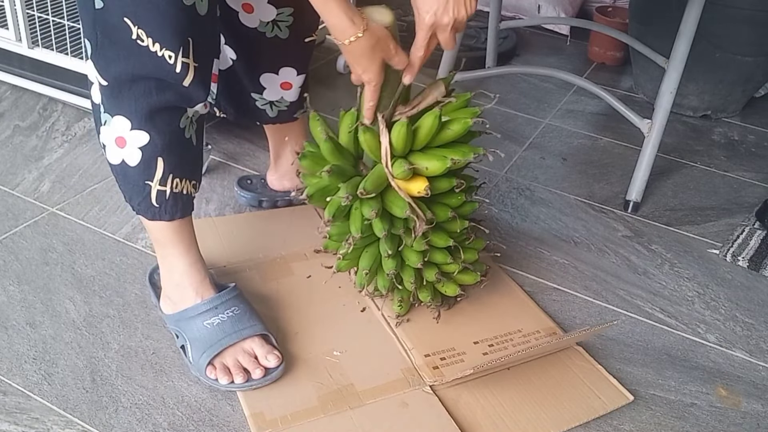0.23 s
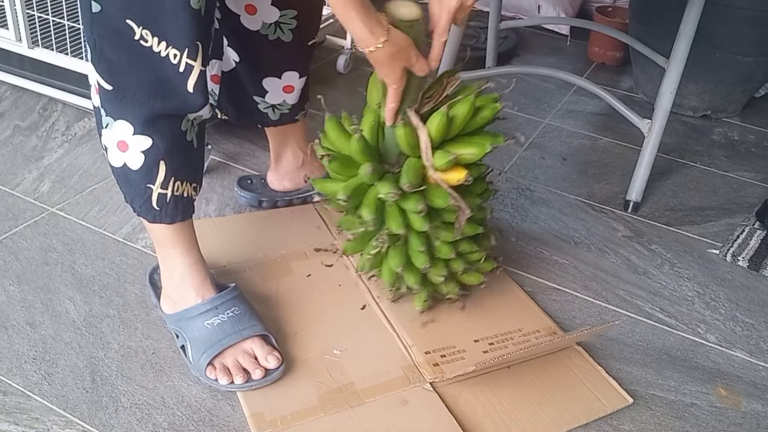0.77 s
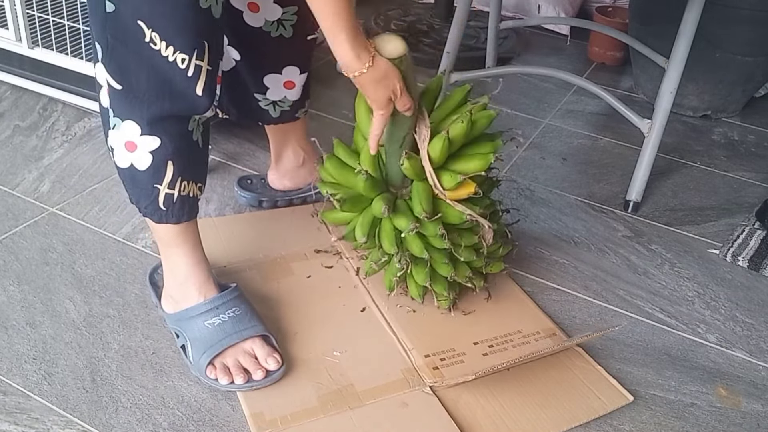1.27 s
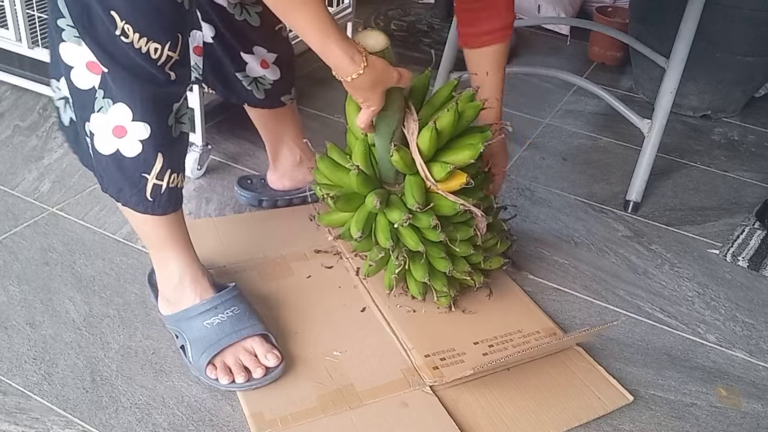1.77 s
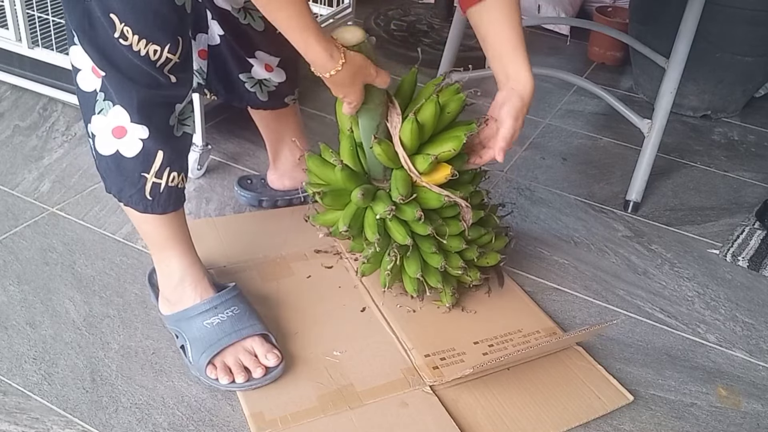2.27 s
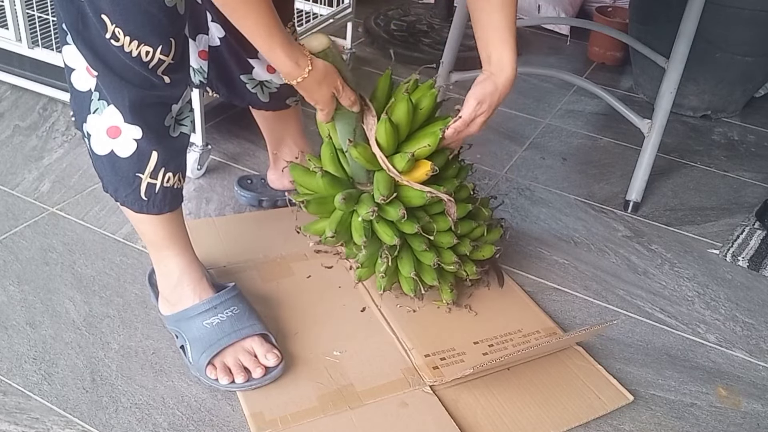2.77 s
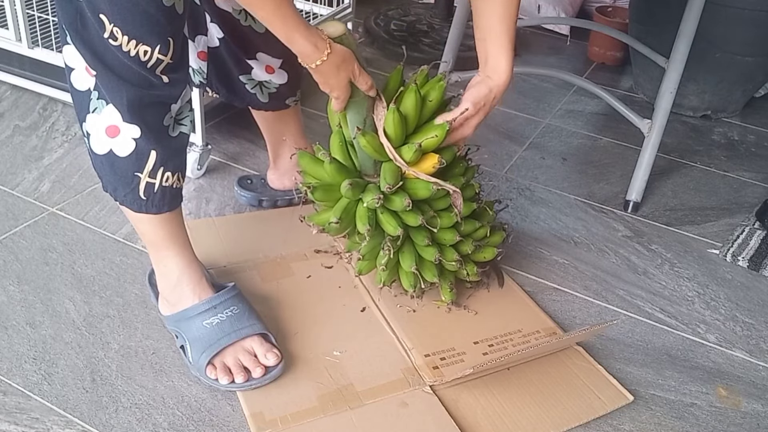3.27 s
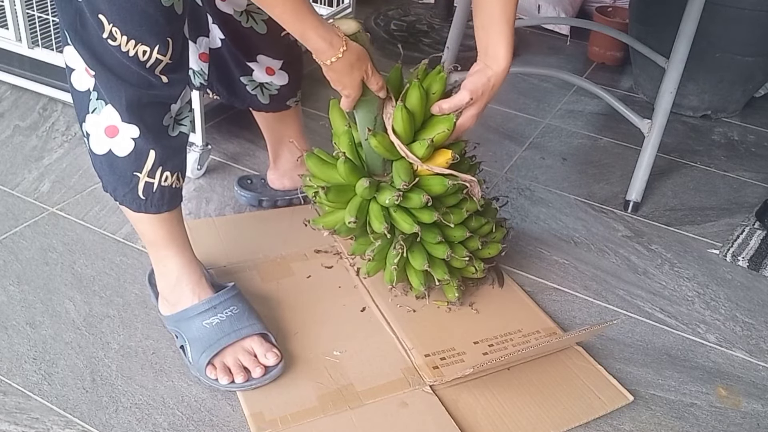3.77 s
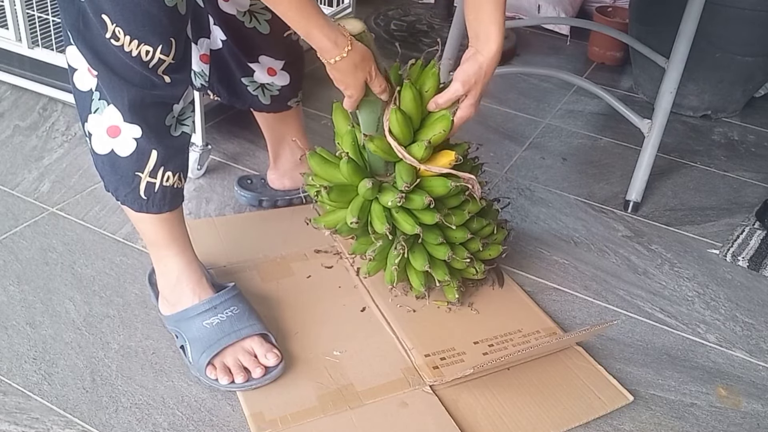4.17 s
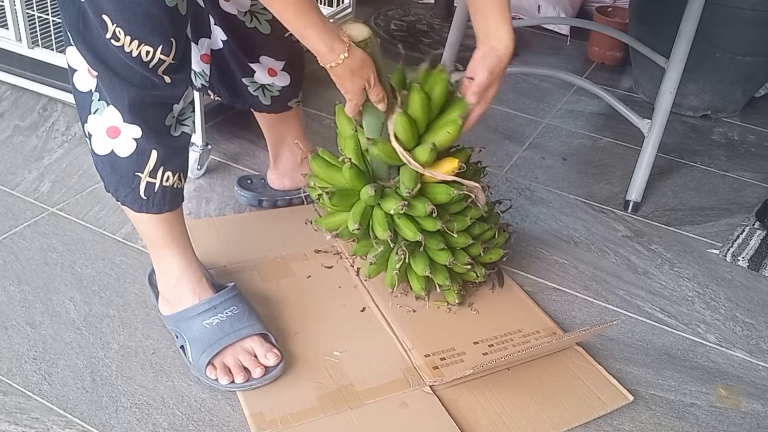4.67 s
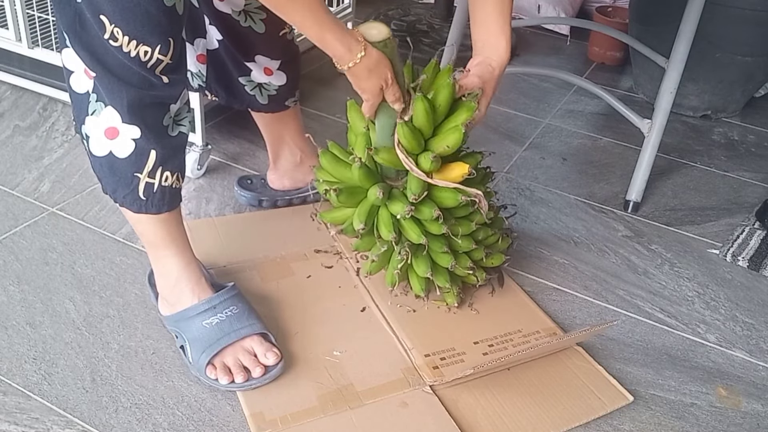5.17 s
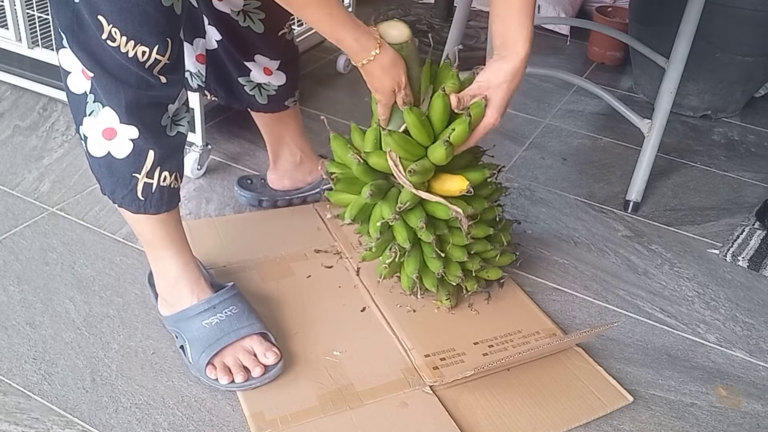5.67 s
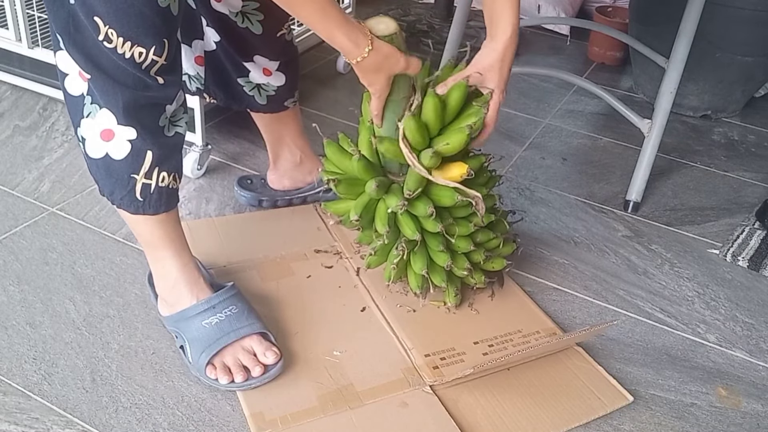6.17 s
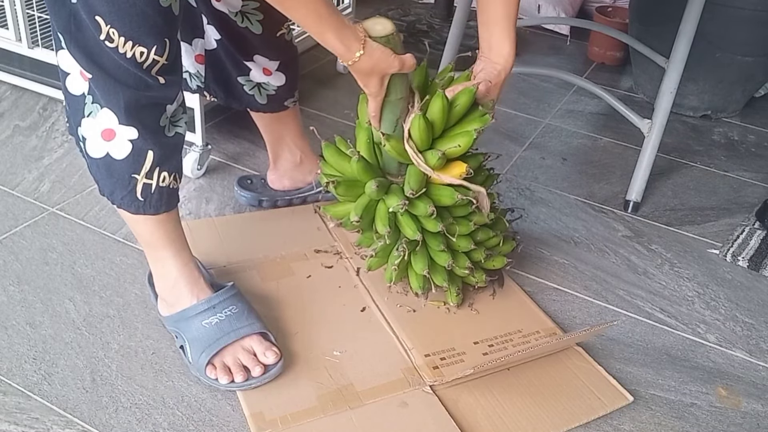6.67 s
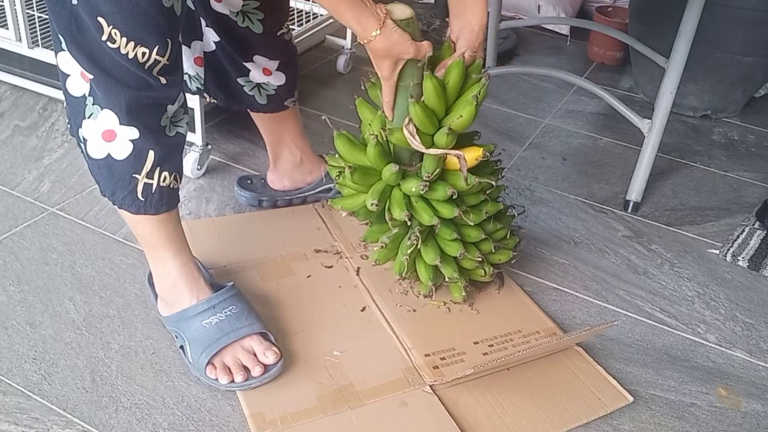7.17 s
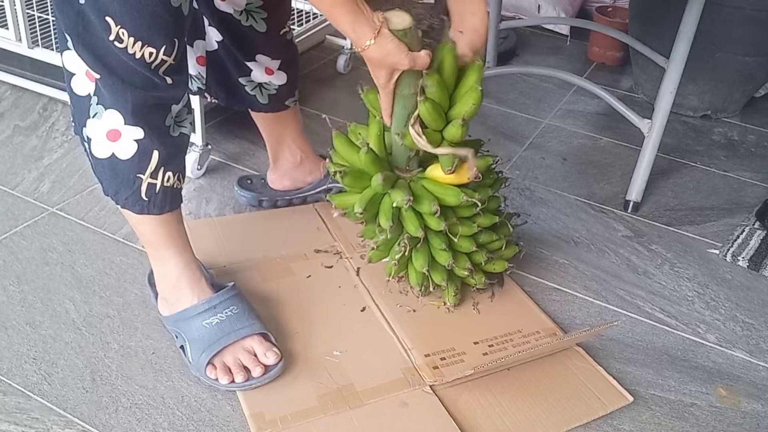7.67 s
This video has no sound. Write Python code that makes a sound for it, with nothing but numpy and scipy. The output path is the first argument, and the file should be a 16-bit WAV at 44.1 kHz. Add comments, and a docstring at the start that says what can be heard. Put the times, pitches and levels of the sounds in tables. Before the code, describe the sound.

Hands twist green bananas off a stalk with crisp snaps and rustling, and a dropped piece knocks and bounces on cardboard.

```python
"""Hands work at a bunch of green bananas: dry fibres snap and rustle, and the skins rub and creak.
A torn-off piece drops and bounces on a cardboard sheet, and something thin rings when brushed.
Snaps and knocks are tiny bursts of noise shaped by what rings; rubbing is noise broken into grains.
The tiled kitchen answers every crack with a short echo. Behind it all a far bird calls,
a motor hums, and insects or a lamp whine faintly."""
import sys
import numpy as np
from scipy import signal
from scipy.fft import rfft, irfft, next_fast_len
from scipy.io import wavfile
from scipy.ndimage import uniform_filter1d, map_coordinates

SR = 44100
rng = np.random.default_rng(int(sys.argv[2]) if len(sys.argv) > 2 else 0)


def wrap_up_sound(samples):
    """Save the sound to the file named by the first command line argument, as 16-bit audio."""
    columns = np.atleast_2d(samples).T
    # keep every value between -1 and 1, then stretch to whole-number steps
    tamed = np.clip(columns, -1, 1)
    steps = np.round(tamed * 32767).astype(np.int16)
    wavfile.write(sys.argv[1], SR, steps)


N = 348831

# Sharp cracks: fibres breaking, and near 1.76-1.85 s a brief metallic clatter: start_s, level_db, ring_hz,
# body_db, air_db
SHARP_CRACKS = [(0.4135, -31, 4170, -10.5, -41), (0.631, -43.5, 6150, -19, -9),
                (0.7831, -36.5, 5140, -46, -11), (0.919, -13.5, 6700, -5, -29),
                (0.922, -21.5, 2820, 20, -17), (1.117, -14.5, 6560, -16.5, -15),
                (1.1216, -14.5, 7060, -37, -32), (1.1724, -24, 4870, -32, -7), (1.2176, -27.5, 3030, 1, -2),
                (1.2313, -16, 3050, -8, -6), (0.939, -33, 3370, -24, 6), (1.243, -32, 3070, -11.5, -6),
                (1.267, -18, 3050, -10, -9), (1.7621, -20, 5500, -10.5, -16), (1.7897, -23, 5340, -5, -14),
                (1.8377, -19.5, 3500, -22, -15), (1.8511, -22, 3280, -10.5, -23.5),
                (2.438, -47, 2480, -22, 9), (2.5022, -47, 6750, -18.5, -5), (2.7109, -47.5, 6400, -2, -17),
                (2.7596, -55, 3000, 1, -16), (3.0807, -57, 5500, -23, -24.5), (3.629, -45.5, 6940, -16, -7),
                (3.6627, -39, 6430, -20, 9), (3.7003, -39.5, 6590, -4, -7),
                (3.7868, -41.5, 6040, -21.5, -34), (3.9449, -42.5, 6270, -28.5, -12.5),
                (3.9953, -37.5, 6610, -23.5, -6.5), (4.0926, -46.5, 5480, -22, -16),
                (4.2511, -4, 5670, -5.5, -18.5), (4.3147, -5, 6000, -8.5, -11.5),
                (4.4352, -18, 6000, -16, -4.5), (4.4411, -26, 6160, -11, -3), (4.4967, -27, 6830, -35, 8),
                (4.5045, -29, 6620, -23, 12), (4.5078, -16, 6660, -12.5, -6), (4.5129, -16, 6450, -40, -6.5),
                (4.7118, -35.5, 5400, -16, -13), (4.813, -43, 6680, -15, -33.5), (4.8764, -41, 6410, -32, 7),
                (4.9534, -44.5, 6420, -20, 5), (4.9202, -43.5, 6750, -22.5, -3.5),
                (5.1475, -24.5, 6550, -32.5, 1.5), (5.2033, -26, 6620, -41, 1), (5.2444, -30, 6600, -27, -2),
                (5.3028, -35, 5920, -32, -1), (5.3378, -37.5, 6190, -27, 3), (5.3951, -41.5, 6000, -30, 1),
                (5.5697, -43.5, 6900, -15, -1), (5.744, -35.5, 3380, -22, -11),
                (5.8726, -42, 3130, -20, -2.5), (6.1769, -41, 6170, -22, -21),
                (6.2968, -46.5, 5620, -22, -16), (6.4647, -48.5, 5890, -22, -7),
                (6.2442, -41.5, 6620, -11.5, -8), (6.6562, -34.5, 6050, -18.5, 1),
                (7.0946, -18.5, 6000, -1, 4), (7.1306, -33.5, 2830, 7, -12), (7.21, -34.5, 5220, 6.5, 2),
                (7.2974, -32, 6900, -7, -10), (7.3513, -30, 5920, -17.5, -14), (7.4054, -35.5, 6600, -24, 1),
                (7.436, -31, 6710, -18, -4.5), (7.5013, -34, 6400, -23.5, 1), (7.5316, -30.5, 5130, -28, -9),
                (7.537, -30, 6650, -27.5, -9.5), (7.7394, -33.5, 6510, -25, -4),
                (7.7555, -35.5, 6260, -13, -13)]
# How the stalk rings, in the groups "body", "crack" and "air": pitch_hz, width_hz, level_db
STALK_RINGS = {"body": [(721.4, 110, -3.2), (1550, 1300, 9.5)], "crack": [(3715, 990, -5.5),
               (5030, 5800, -4.5)], "air": [(12500, 13000, 8.5)]}
# Hand strokes; the rustle swells by 20 dB over rise_s and fades by 20 dB over fall_s:
# peak_s, rise_s, fall_s, rustle_db, creak_over_rustle_db, air_over_rustle_db, creak_hz
HAND_STROKES = [(0.002, .05, 0.057, -64, -6, -2, 2260), (0.094, 0.052, 0.07, -45.5, -13.5, 1.5, 1070),
                (0.214, 0.32, 0.054, -59, -10, 4, 1040), (0.299, 0.05, 0.043, -46, -13.5, 3.5, 1510),
                (0.425, 0.097, 0.32, -51, -5.5, 2.5, 1440), (0.841, 0.15, 0.24, -48, -5, 2.5, 930),
                (0.916, 0.07, 0.081, -38.5, 11.5, 7.5, 1400), (1.074, 0.023, .1, -56, 7, -15, 1400),
                (1.123, 0.049, .12, -39.5, 1, 8.5, 1730), (1.17, 0.1, 0.053, -34, -6.5, 2.5, 1960),
                (1.279, 0.25, 0.064, -56, 3.5, -19, 1660), (1.43, 0.17, 0.069, -71, -22, 3, 1200),
                (1.766, 0.0048, 0.18, -34.5, -19, -10, 1060), (1.858, 0.064, 0.17, -45, -11, -23, 1060),
                (1.96, .01, 0.4, -51, -21, -2.5, 1200), (2.1, 0.033, 0.21, -63.5, -21.5, 0, 1500),
                (2.22, .03, .25, -56, -20.5, -1, 1700), (2.4, .02, .22, -76, 6, 2, 1470),
                (2.64, .12, .35, -74, 1, 3, 2590), (3.64, 0.067, 0.23, -69, 10.5, 4, 1137),
                (3.7, 0.11, 0.27, -59.5, 0.5, 2.5, 1050), (3.955, 0.021, 0.031, -58, -7, 5, 1567),
                (4.1, .17, .2, -65, -9, -2, 1870), (4.197, 0.086, 0.053, -63, -11, -3, 1570),
                (4.263, 0.013, 0.17, -36.5, -2, 1, 2000), (4.445, 0.011, 0.17, -48.5, -16, 2, 2000),
                (4.565, .02, 0.33, -57, -11, 0.5, 1900), (4.723, 0.19, 0.38, -61.5, -6.5, 2.5, 1380),
                (5.007, 0.19, 0.31, -67, 0.5, 5.5, 2060), (5.168, .02, 0.42, -64, -6, 11.5, 2062),
                (5.298, 0.049, 0.22, -56.5, -14.5, 9.5, 1680), (5.583, 0.11, .45, -59.5, -4.5, 4, 2200),
                (5.755, 0.14, .45, -54, -8, 1.5, 2240), (5.893, 0.21, 0.061, -57.5, -5.5, 2, 2620),
                (5.978, 0.045, 1, -63, -7, 3.5, 2340), (6.256, 0.049, .11, -62, -20, -1, 1576),
                (6.199, .05, 0.13, -70, 1, 0, 1280), (6.389, 0.056, 0.2, -60.5, -8, 0.5, 1556),
                (6.652, 0.043, 0.12, -60.5, -15.5, 7, 2390), (6.836, 0.035, 0.14, -64, -21.5, -8, 1660),
                (6.966, 0.14, 0.14, -70, -24, -8, 2350), (7.04, 0.039, .2, -61, 8, 4, 1750),
                (7.1, 0.025, 0.15, -48.5, -2.5, -5.5, 1460), (7.21, 0.037, 0.13, -65, 7, -3.5, 1600),
                (7.313, 0.56, 0.079, -52.5, -7.5, 1.5, 1960), (7.361, 0.081, 0.34, -50.5, -12.5, 4.5, 2246),
                (7.543, 0.023, 0.15, -48, -14.5, 3.5, 2177), (7.619, 0.13, .12, -55.5, -7.5, 6, 2280),
                (7.759, 0.056, 0.1, -45, -9, 1.5, 1960), (7.898, 0.074, .1, -58, -26, -6.5, 2220)]
# The tone of rubbing, from bass to treble: pitch_hz, level_db
RUB_COLOUR = [(76, -44.5), (130, -13.5), (263, -16.5), (418, -6), (613, -4), (780, -4.5), (1140, -4.5),
              (1430, 0.5), (1860, -6.5), (4410, -5.5), (6730, 1), (7910, -6.5), (13100, -0.5),
              (16000, -6.5)]
# The dropped piece landing and bouncing: start_s, level_db, ring_hz, thud_db, click_db, echo_db
BOUNCES = [(1.9191, -25.5, 1600, -11, -15, -1), (1.9272, -24.5, 910, 0.5, -27.5, 0.5),
           (1.9468, 0, 1265, -4.5, -20.5, -3.5), (2.0485, -25.5, 1450, -16.5, -36, -9.5),
           (2.0738, -23, 1510, 3, -26, 1), (2.0872, -18.5, 850, -4, -40.5, -7.5),
           (2.0962, -17.5, 1930, -0.5, -25, -8), (2.1985, -32.5, 1440, -8, -35.5, -8),
           (2.2136, -6, 1720, -19, -29, -8.5), (2.2776, -8, 2000, -14.5, -30.5, -8.5),
           (2.3118, -16.5, 1700, -13, -37, -13.5)]
# How each landing rings: pitch_hz, width_hz, level_db
BOUNCE_RINGS = [(264, 62, -4), (424, 40, 6), (663, 90, -1.5), (790, 290, -10), (1136, 23, 3.5),
                (1217, 78, 1), (1640, 120, 5), (2800, 390, 8.5)]
# Brushes against the thin object: start_s, level_db
BRUSH_TOUCHES = [(0.087, -62), (1.76, -48), (1.79, -46), (1.845, -47)]
# The thin object's tones: pitch_hz, level_db, fade_s (time to fall by 60 dB)
THIN_TONES = [(1084, -0.5, .45), (1316, -5, .17), (1680, -3, 0.22), (3104, -7, .15)]
# The bird's notes: start_s, length_s, first_hz, last_hz, level_db
BIRD_NOTES = [(2.436, 0.1, 2274, 2217, -62), (2.613, 0.081, 3436, 3060, -61),
              (2.79, 0.093, 2316, 2193, -67.5), (4.97, 0.057, 2194, 2240, -71),
              (5.591, 0.07, 2230, 2300, -62), (5.937, 0.087, 2294, 2325, -61.5)]
# The motor's hum and the faint whines: pitch_hz, level_db
HUM_AND_WHINES = [(102.3, -73.5), (6401, -83.5), (8177, -91), (12801, -90.5), (13598, -91)]
# The tone of the room's hiss and rumble: pitch_hz, level_db
HISS_COLOUR = [(25, -41.5), (59, -16.5), (91, -4), (130, -20.5), (260, -23.5), (600, -30.5), (1000, -34.5),
               (4200, -43.5), (6500, -33.5), (7300, -34.5), (8400, -25.5), (9300, -49), (12600, -37.5),
               (15600, -42)]
# How alike left and right are, for hiss and for rubbing: pitch_hz, likeness (1 = the same)
HISS_LIKENESS = [(60, 0.7), (240, 0.64), (950, 0.083), (3770, 0.17), (15000, 0.12)]
RUB_LIKENESS = [(500, 0.31), (4000, 0.59), (12000, 0.19)]
# How long the kitchen echoes: pitch_hz, fade_s (time to fall by 60 dB)
ECHO_FADES = [(200, 0.44), (1400, 0.23), (4000, 0.33), (10000, .22)]
# Pitches that the microphone's opening lifts or lowers: pitch_hz, width_hz, gain_db
MIC_RINGS = [(6340, 1800, 3.5), (7820, 1266, -7), (12500, 9800, -0.5)]
# The microphone's balance: pitch_hz, left_minus_right_db
MIC_BALANCE = [(500, -3), (4000, 0), (7000, 0.5), (12000, -10)]

CREAK_SWING, AIR_SWING = 1.2, 1.3  # creak and air swell and fade more steeply than the rustle
HISS_DB, TOP_HZ = -63, 15750


def sharp_cracks():
    """A sharp crack rings, with the stalk's body below it and airy treble above."""
    def stalk(f, group):
        return sum(amp(db) * resonance(f, hz, width) ** 2 for hz, width, db in STALK_RINGS[group])

    def colour(f, ring_hz, body_db, air_db):
        crack = resonance(f, ring_hz, 900) + stalk(f, "crack")
        return crack - amp(body_db) * stalk(f, "body") - amp(air_db) * stalk(f, "air")

    echo_db = -4
    return hits([(*row, echo_db) for row in SHARP_CRACKS], colour, burst_s=.0013, pan_db=1, scatter_db=3)


def rubbing_hands():
    """Skins and fibres rub; bent fibres creak at a pitch set by the grip, and the finest ones tick."""
    def band(noise, low_hz, high_hz):
        edges = lambda f: np.sqrt((1 + (low_hz / (f + 1)) ** 8) * (1 + (f / high_hz) ** 8))
        return unit(filtered(noise, lambda f: amp(along(RUB_COLOUR, f)) / edges(f)))

    rustle_gain, creak_gain, air_gain, creak_hz = stroke_curves()
    pan_db = -0.5 + 1.2 * wobble(18)
    coarse = slipping_noise(slips_per_s=380, spread_db=5, fade_s=0.0028, strength=.5)
    fine = slipping_noise(slips_per_s=87, spread_db=7, fade_s=0.00068, strength=1.6)
    creak = 0
    for hz in 800 * 1.2 ** np.arange(8):  # each ring fades in as the creak's pitch passes it
        nearness = np.clip(1 - abs(np.log(creak_hz / hz)) / np.log(1.2), 0, 1) ** .5
        ring = lambda f: resonance(f, hz, hz / 5) ** 2 + .4 * resonance(f, 2.2 * hz, hz / 3) ** 2
        creak += nearness * unit(filtered(coarse, ring))
    low = creak_gain * (0.74 * band(coarse, 60, 2600) + 0.61 * creak)
    rustle = rustle_gain * band(coarse + 0.47 * fine, 2800, 8000)
    air = air_gain * band(fine, 7700, 20040)
    direct = amp(-3.5) * (low + rustle + air) * amp([pan_db / 2, -pan_db / 2])
    echo = signal.fftconvolve(direct, room_echo(rise_s=0.004, likeness=0.19), axes=1)[:, :N]
    return direct + amp(-11) * echo


def stroke_curves():
    """Strokes swell and fade: gives the rustle, creak and air gains, and the loudest creak's pitch."""
    t = np.arange(0, N, 32) / SR
    peak_s, rise_s, fall_s, db, creak_db, air_db, creak_hz = np.transpose(HAND_STROKES)[..., None]
    down_db = 20 * np.where(t < peak_s, (peak_s - t) / rise_s, (t - peak_s) / fall_s)
    power = [amp(2 * (db + over_db - swing * down_db))
             for over_db, swing in ((0, 1), (creak_db, CREAK_SWING), (air_db, AIR_SWING))]
    gains = np.sqrt(np.sum(power, axis=1))
    loudest = np.argmax(db + creak_db - CREAK_SWING * down_db, axis=0)
    pitch_hz = uniform_filter1d(creak_hz[loudest, 0], size=20)
    return [np.interp(np.arange(N) / SR, t, curve) for curve in (*gains, pitch_hz)]


def slipping_noise(slips_per_s, spread_db, fade_s, strength):
    """Stereo noise that jumps in level at each tiny slip and dies back."""
    slips = (rng.random(N) < slips_per_s / SR) * amp(np.minimum(spread_db * rng.exponential(size=N), 12))
    fade = np.exp(-np.arange(600) / (fade_s * SR))
    grains = 1 + strength * signal.fftconvolve(slips, fade)[:N]
    return stereo_noise(RUB_LIKENESS) * grains * amp(0.85 * wobble(40))


def bouncing_piece():
    """Each landing rings most near its own pitch; the soft contact dulls it, and hard blows click."""
    def colour(f, ring_hz, thud_db, click_db):
        ring = 1.1 * resonance(f, ring_hz, 1300) ** 2 + 1.2 * resonance(f, ring_hz, 280)
        for k, (hz, width, db) in enumerate(BOUNCE_RINGS):
            strike_db = thud_db if hz < 700 else -9 * abs(np.log2(hz / ring_hz))
            ring += (-1) ** k * amp(db + strike_db) * resonance(f, hz, width)
        softness = (1j * f / (200 + 1j * f)) ** 2 / (1 + 1j * f / 2400) ** 5
        return softness * ring + amp(click_db) * resonance(f, 2200, 5300) ** 2

    return hits(BOUNCES, colour, burst_s=0.0006, pan_db=-0.1, scatter_db=0.97)


def thin_ringing():
    """Each brush sets something thin ringing with a few tones that start softly and die away."""
    out, t = np.zeros(N + SR), np.arange(SR // 2) / SR
    soft_start = 1 - np.exp(-t / 0.0052)
    for start_s, db in BRUSH_TOUCHES:
        for hz, tone_db, fade_s in THIN_TONES:
            pitch_hz = hz * (1 + 0.0081 * rng.standard_normal())
            tone = np.sin(2 * np.pi * (pitch_hz * t + rng.random()))
            out[round(start_s * SR):][:len(t)] += amp(db + tone_db - 60 * t / fade_s) * soft_start * tone
    return out[:N]


def far_bird():
    """Short wavering whistles, blurred by distance."""
    out = np.zeros((2, N + SR))
    for start_s, length_s, first_hz, last_hz, db in BIRD_NOTES:
        progress = np.linspace(0, 1, int(length_s * SR))
        waver = unit(uniform_filter1d(rng.standard_normal(len(progress)), size=250))
        pitch_hz = (first_hz + (last_hz - first_hz) * progress) * (1 + 0.0398 * waver)
        note = np.sin(2 * np.pi * np.cumsum(pitch_hz) / SR) * np.sin(np.pi * progress ** 0.5)
        heard = signal.fftconvolve(note[None], room_echo(rise_s=0.00031, likeness=0.14), axes=1)
        heard[:, :len(note)] += 0.56 * note
        out[:, round(start_s * SR):][:, :heard.shape[1]] += amp(db) * heard
    return out[:, :N]


def room_hiss():
    """Soft hiss and rumble that drift a little in level."""
    gain = amp(HISS_DB + 1.2 * wobble(2.3))
    return gain * unit(filtered(stereo_noise(HISS_LIKENESS), lambda f: amp(along(HISS_COLOUR, f))))


def hum_and_whines():
    """A motor hums and insects or a lamp whine: pure tones, unsteady in level and pitch."""
    t = np.arange(N) / SR
    return sum(np.sqrt(2) * amp(db + 2.5 * wobble(8.7)) * np.sin(2 * np.pi * hz * t + .9 * wobble(3.3))
               for hz, db in HUM_AND_WHINES)


def hits(table, colour, burst_s, pan_db, scatter_db):
    """Each hit is a burst of slips, shaped by colour, placed left or right and given its own echo."""
    out, t = np.zeros((2, N + SR)), np.arange(2048) / SR
    for start_s, db, ring_hz, low_db, high_db, echo_db in table:
        shared, left, right = rng.standard_normal((3, len(t)))
        side_db = pan_db + scatter_db * rng.standard_normal()
        burst = np.array([shared + 0.8 * left, shared + 0.18 * right, 0 * t])
        burst *= np.exp(-(t / burst_s) ** 2)
        burst[:, 0] += 2.5  # the sharp jolt; the third row holds only this and feeds the echo
        *direct, jolt = filtered(burst, lambda f: colour(f, ring_hz, low_db, high_db))
        direct = amp(db) * np.array(direct) / np.abs(np.mean(direct, axis=0)).max()
        jolt *= np.linalg.norm(direct[0]) / np.linalg.norm(jolt)
        echo = room_echo(rise_s=0.003, likeness=0.49)
        heard = amp(echo_db) * signal.fftconvolve(jolt[None], echo, axes=1)
        heard[:, :len(t)] += direct * amp([[side_db / 2], [-side_db / 2]])
        out[:, round(start_s * SR):][:, :heard.shape[1]] += heard
    return out[:, :N]


def room_echo(rise_s, likeness):
    """The walls' answer to a click: noise that builds quickly, each pitch dying at its own speed."""
    hz, t, (mid, side) = signal.stft(rng.standard_normal((2, SR // 3)), SR, nperseg=256)
    side = side * (1 - likeness) * np.clip(hz / 2500, .3, 1.3)[:, None]  # bass reaches both sides alike
    fade = amp(-60 * t / along(ECHO_FADES, hz)[:, None])
    echo = signal.istft(np.array([mid + side, mid - side]) * fade, SR, nperseg=256)[1]
    echo *= np.clip(np.arange(echo.shape[1]) / (rise_s * SR), 0, 1)
    return echo / np.linalg.norm(echo[0])


def stereo_noise(likeness):
    """Left and right noise, as alike at each pitch as the table says."""
    def shares(f):
        angle = np.arccos(np.clip(along(likeness, f), -1, 1)) / 2
        return np.array([np.cos(angle), np.sin(angle)])

    mid, side = filtered(rng.standard_normal((2, N)), shares)
    return np.array([mid + side, mid - side])


def resonance(f, hz, width_hz):
    """A ringing filter: passes hz in full and weakens the pitches around it."""
    return 1j * f * width_hz / (hz * hz - f * f + 1j * f * width_hz)


def filtered(x, response):
    """Scales and delays each frequency f in x as response(f) says."""
    length = x.shape[-1]
    padded = next_fast_len(length + 4096)
    return irfft(rfft(x, padded) * response(np.fft.rfftfreq(padded, 1 / SR)), padded)[..., :length]


def wobble(per_s):
    """A smooth curve through per_s random values a second."""
    return map_coordinates(rng.standard_normal(int(N * per_s / SR) + 4), [np.arange(N) * per_s / SR])


def along(points, hz):
    """Reads between the rows of a (pitch_hz, value) table, spaced by octaves."""
    pitches, values = np.transpose(points)
    return np.interp(np.log(hz + 1), np.log(pitches + 1), values)


def amp(db):
    """Turns decibels into a gain."""
    return 10 ** (np.asarray(db) / 20)


def unit(x):
    """Scales x to an average (rms) level of 1."""
    return x / np.sqrt(np.mean(x ** 2) + 1e-20)


def scene():
    """The microphone's opening colours the near sounds; bird, hiss and hum lie under them."""
    near = sharp_cracks() + bouncing_piece() + thin_ringing() + rubbing_hands()
    opening = lambda f: np.prod([1 + (amp(db) - 1) * resonance(f, hz, width)
                                 for hz, width, db in MIC_RINGS], axis=0)
    balance = lambda f: amp(np.array([[.5], [-.5]]) * along(MIC_BALANCE, f))
    return filtered(near, lambda f: opening(f) * balance(f)) + far_bird() + room_hiss() + hum_and_whines()


def record(dry):
    """Flattens peaks beyond full scale and removes the treble above TOP_HZ."""
    return filtered(np.clip(dry, -1, 1), lambda f: 1 / (1 + (f / TOP_HZ) ** 300))


dry = scene()
out = record(dry)
wrap_up_sound(out)
```